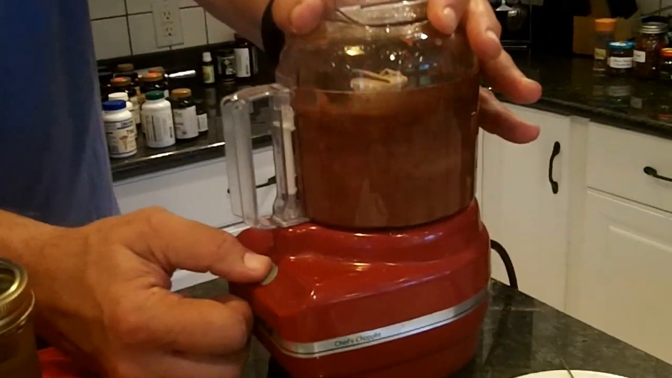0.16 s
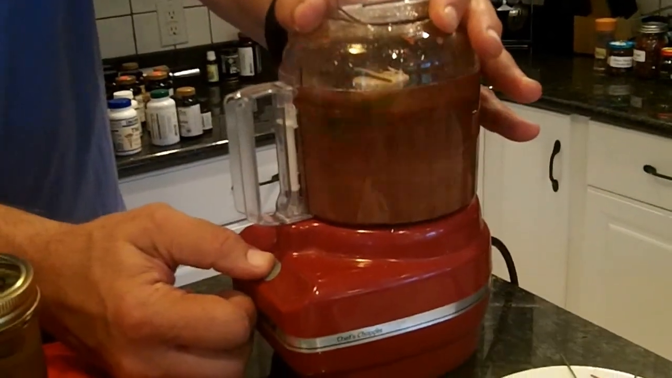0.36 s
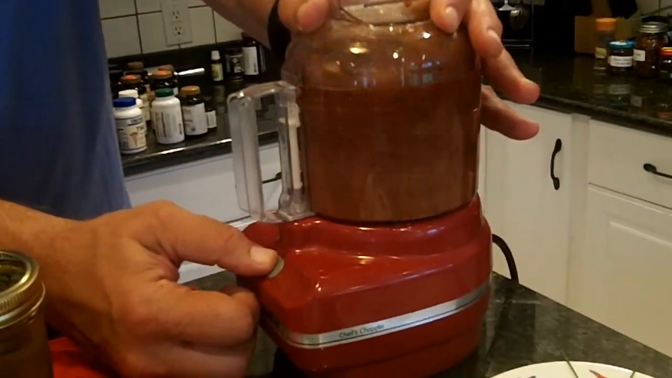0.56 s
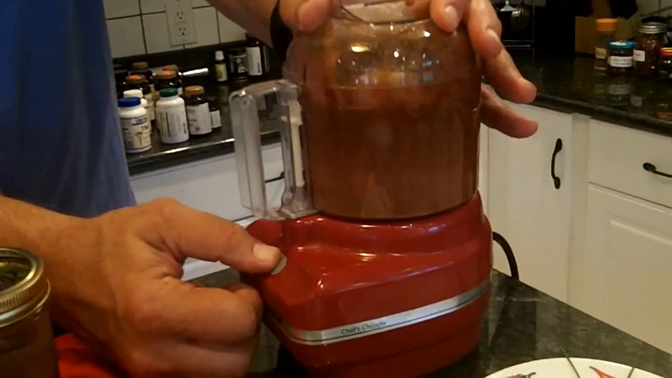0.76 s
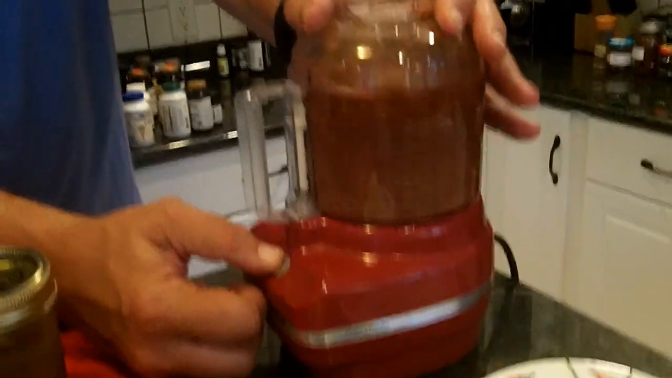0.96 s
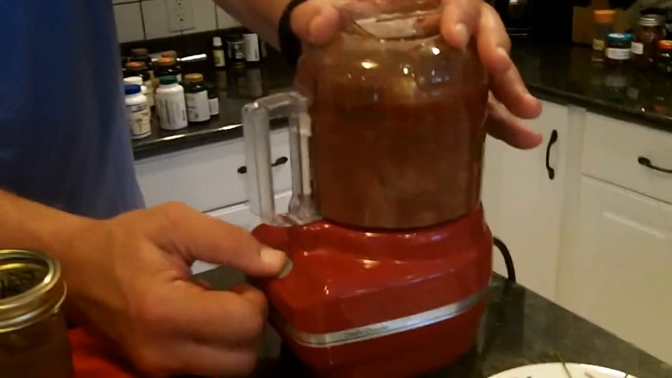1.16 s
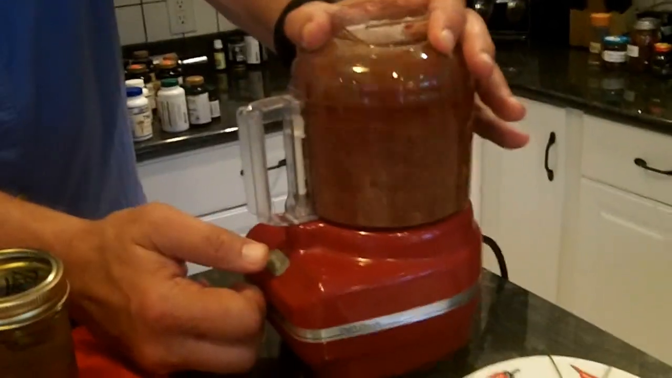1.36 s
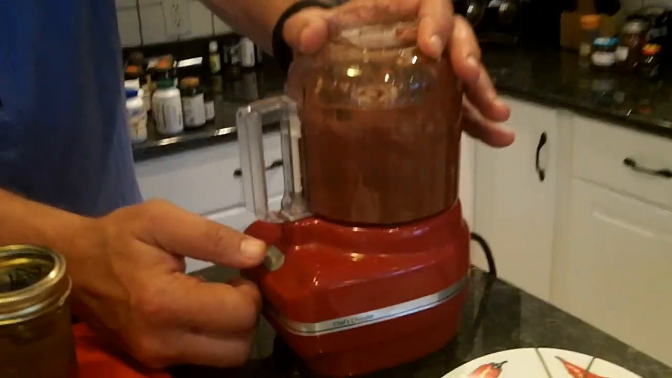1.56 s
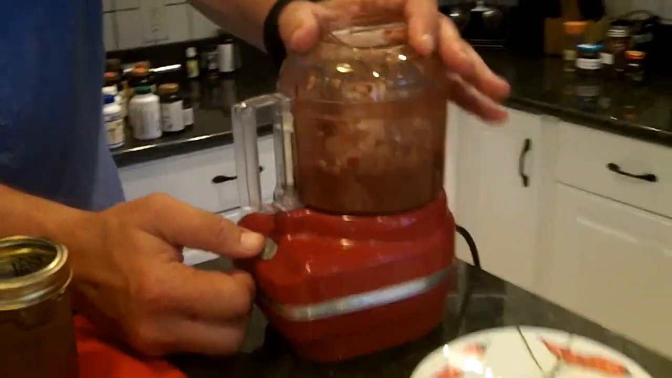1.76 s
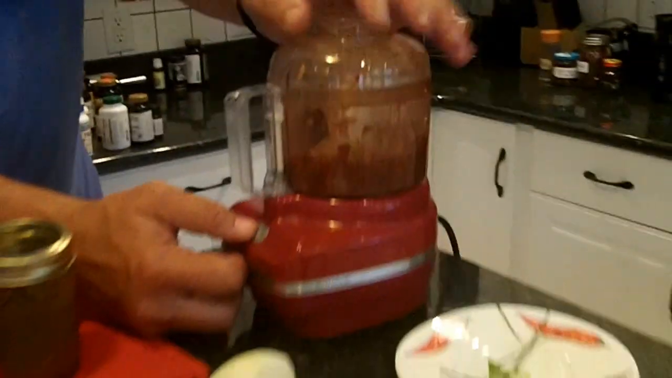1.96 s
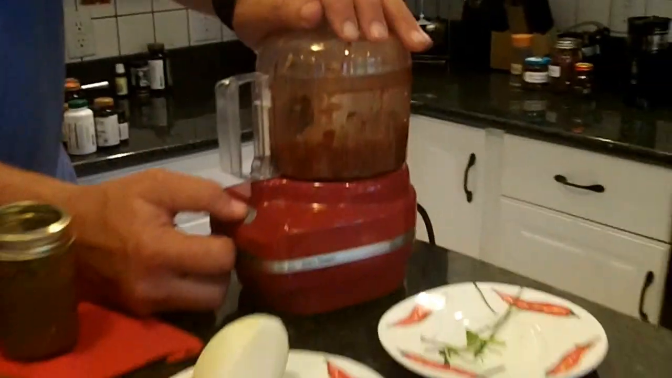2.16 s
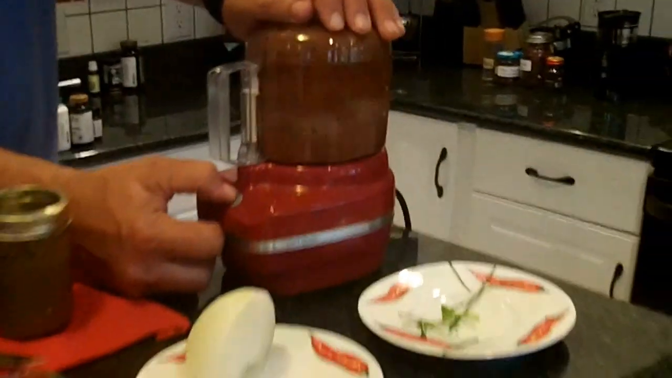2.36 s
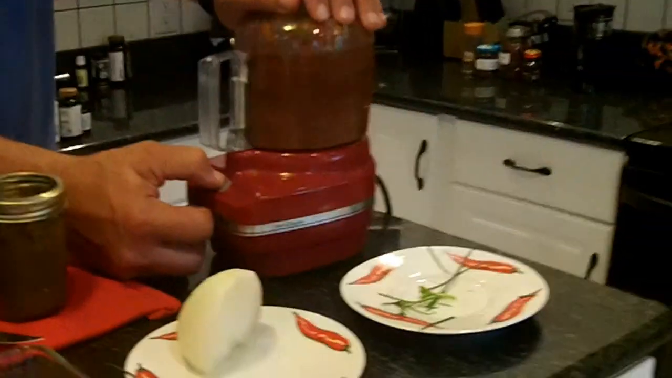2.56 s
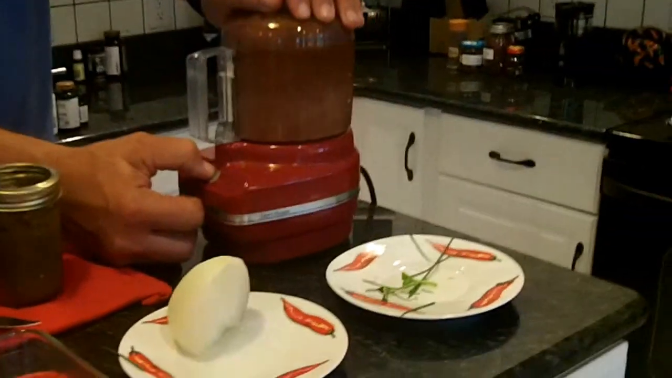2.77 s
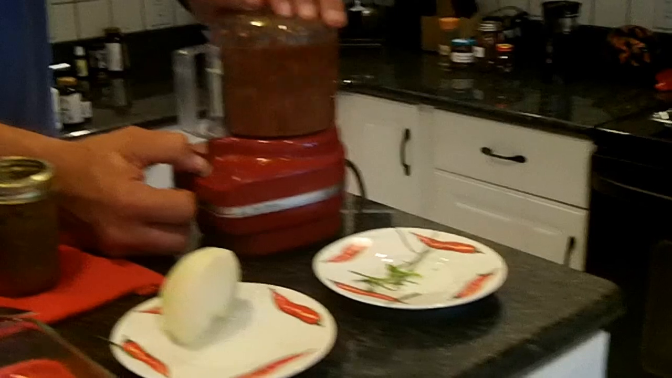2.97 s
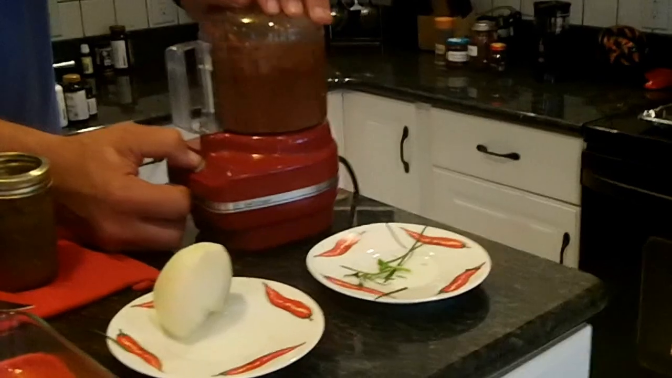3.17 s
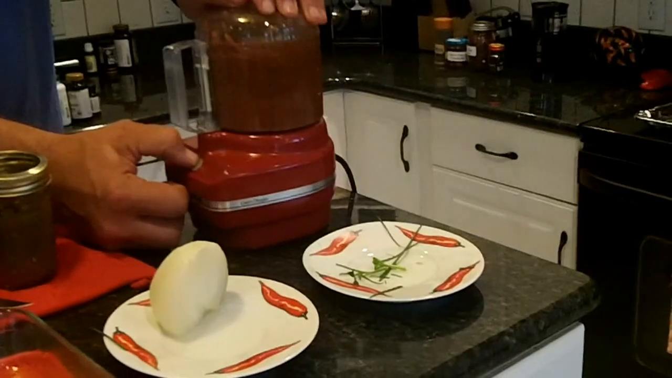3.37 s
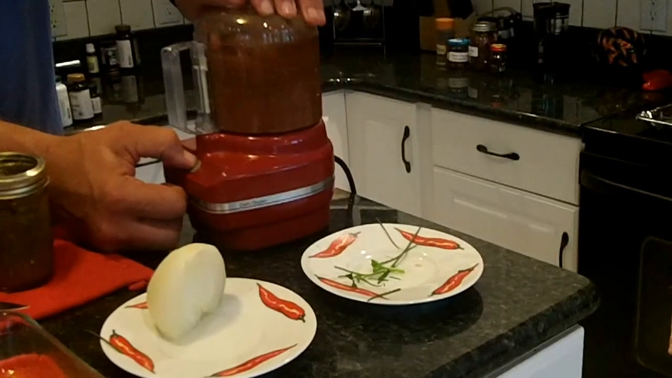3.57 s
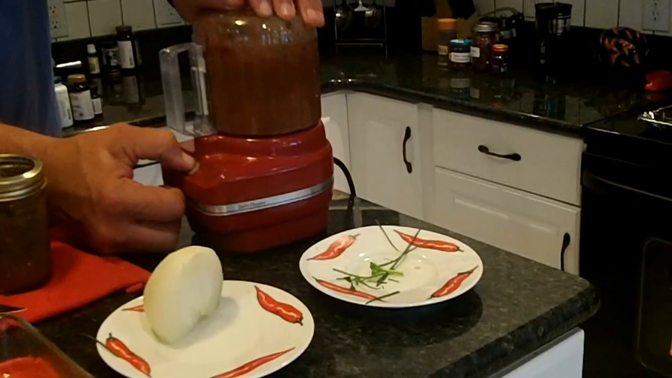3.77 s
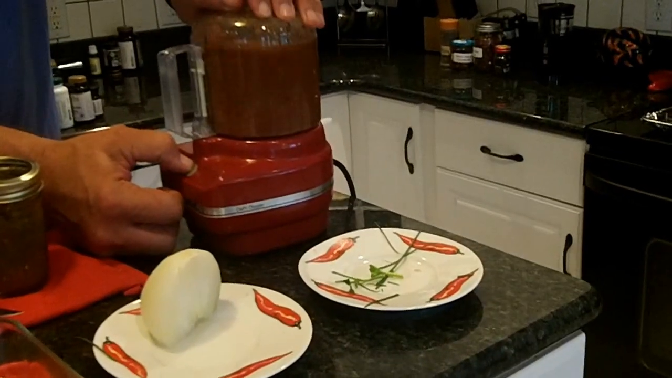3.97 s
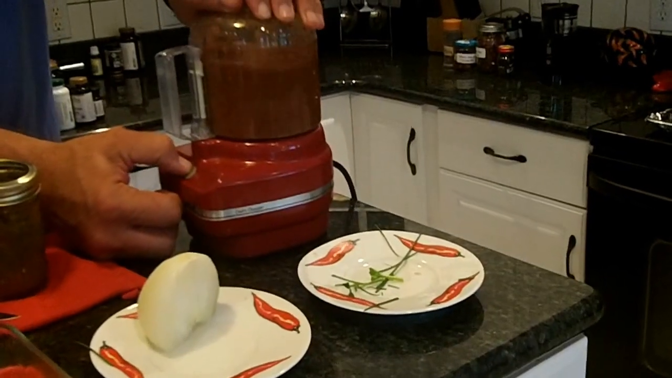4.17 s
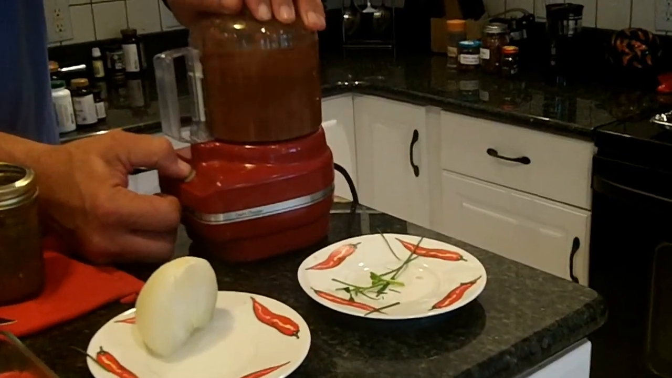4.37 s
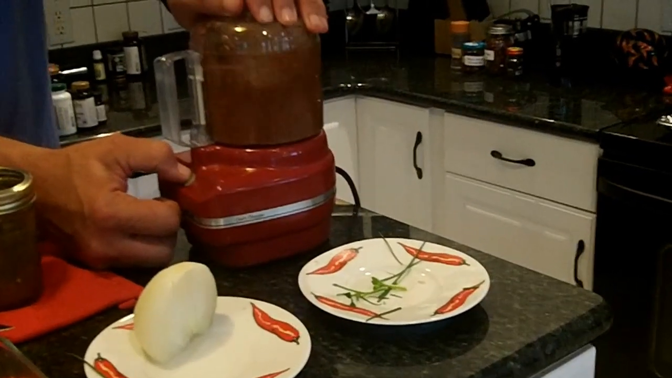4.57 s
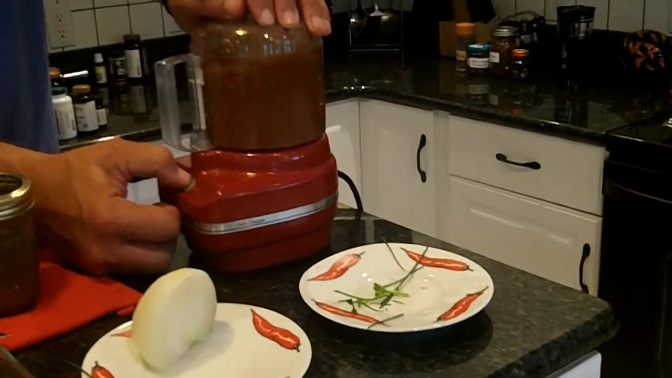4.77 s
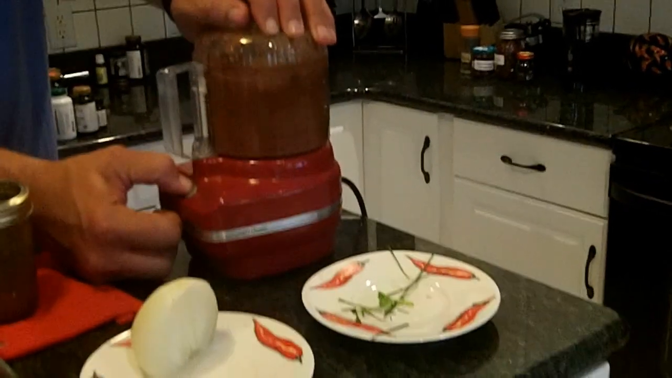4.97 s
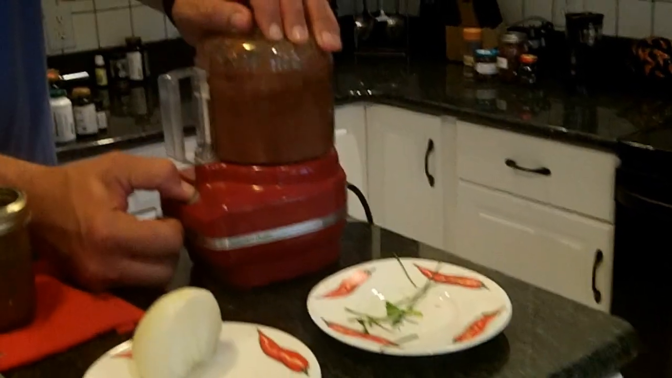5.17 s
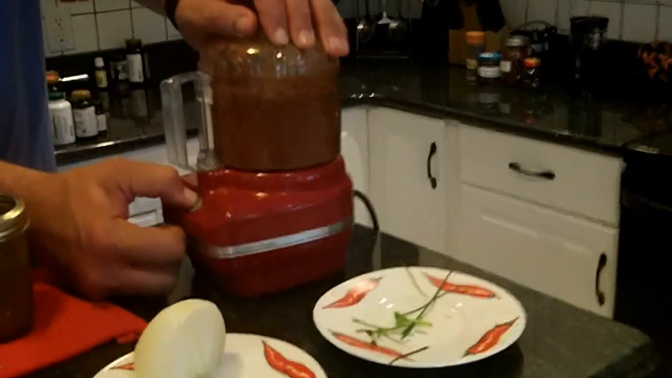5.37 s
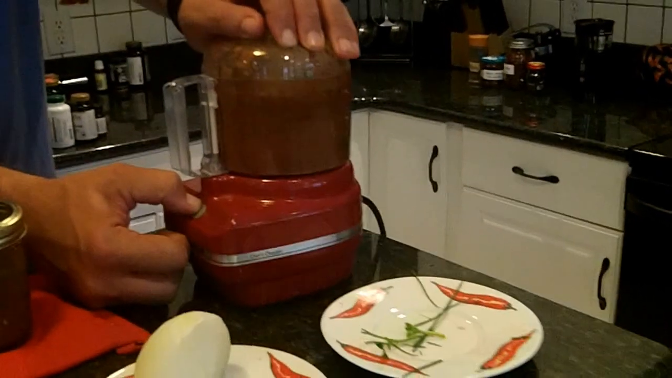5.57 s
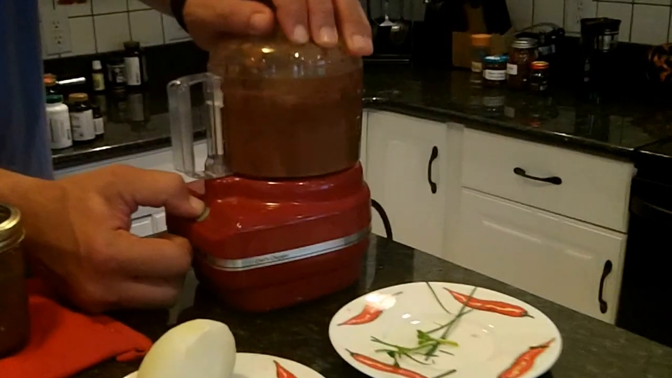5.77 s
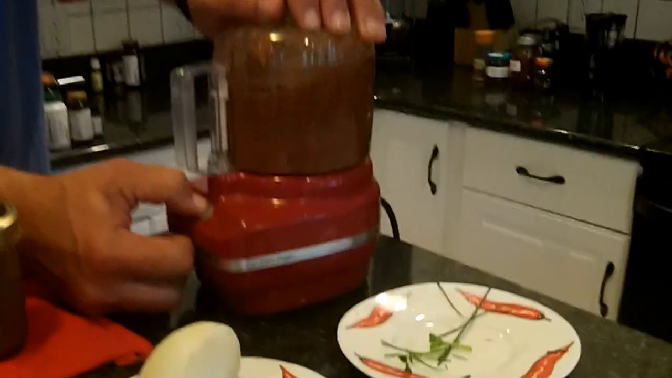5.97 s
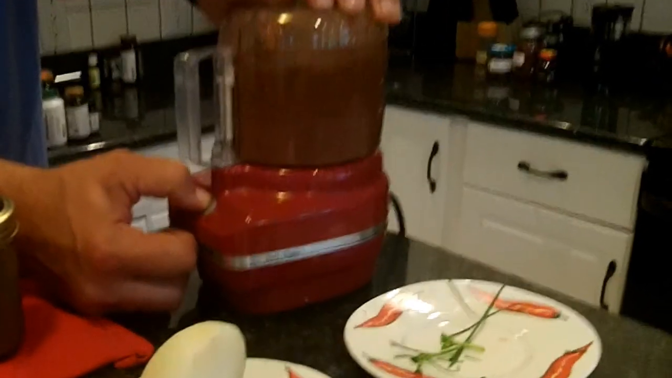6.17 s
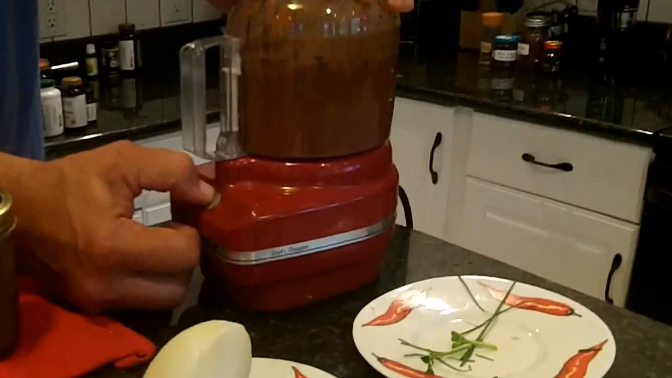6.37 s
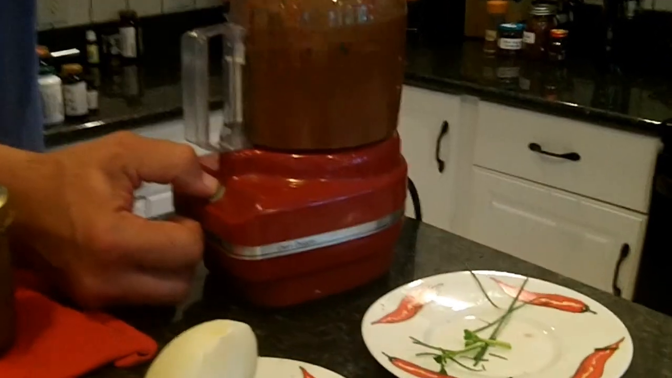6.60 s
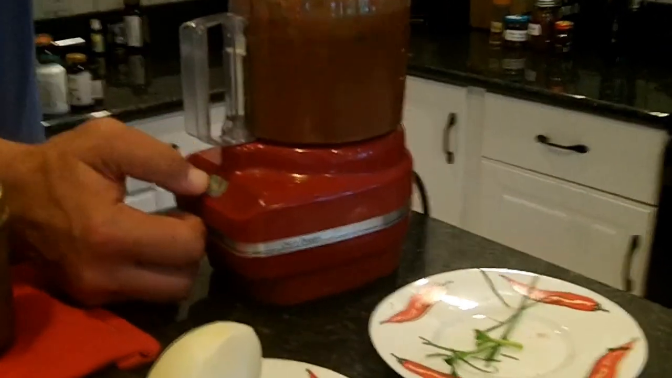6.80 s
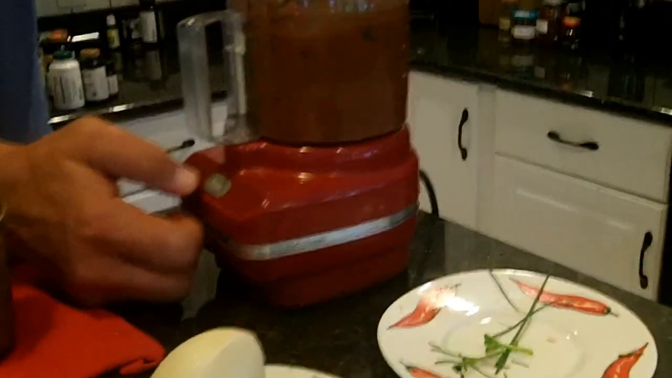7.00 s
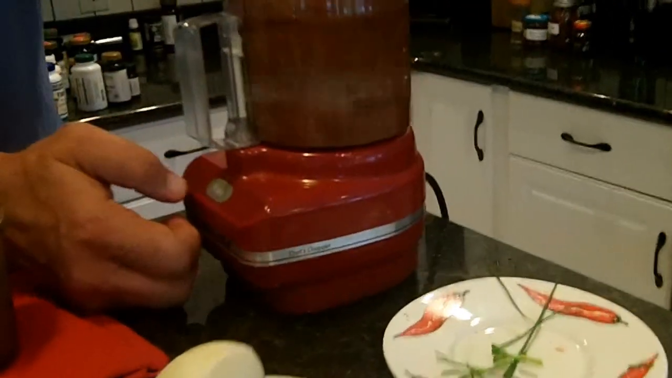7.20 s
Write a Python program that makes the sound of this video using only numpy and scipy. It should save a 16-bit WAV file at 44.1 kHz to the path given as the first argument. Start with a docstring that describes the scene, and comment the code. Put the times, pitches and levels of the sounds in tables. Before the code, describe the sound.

A small food processor whines at high speed through wet vegetable pulp, winds down to a brief dripping pause, then spins up for a longer second run.

```python
"""A small kitchen food processor chops wet vegetables in two pulses, with a short pause between them.
A fast motor drives the blade through a gear: the 12 pinion teeth whine as sine tones tied to one speed curve.
Coloured noise makes the casing rattle, the wet splash, a treble fizz, the drone of the base and worktop rumble.
Pulp slaps the bowl once a blade turn, chunks jolt the drive, and drops tick down in the pause.
A tiled kitchen answers with an echo; a gain control ducks the sound after loud moments."""
import sys
import numpy as np
from scipy import signal
from scipy.fft import rfft, irfft, next_fast_len
from scipy.io import wavfile
from scipy.ndimage import uniform_filter1d, map_coordinates

SR = 44100
rng = np.random.default_rng(int(sys.argv[2]) if len(sys.argv) > 2 else 0)


def store_pcm(level_fs):
    """Save levels as 16-bit WAV."""
    pcm = np.round(np.clip(level_fs, -1, 1) * 32767).astype(np.int16)
    wavfile.write(sys.argv[1], SR, np.atleast_2d(pcm).T)


N = 319284

TEETH = 12  # teeth on the motor's pinion
TEETH_PER_BLADE_TURN = 75.8
# when the whine takes its driven levels: from_s, to_s
DRIVEN_SPANS = [(-0.1, 1.5), (2.32, 6.92)]
# how hard the pulp churns, before random swings: time_s, rattle_db, splash_db
CHURN = [(0.06, -28, -33.5), (0.138, -33, -38), (0.21, -30.5, -33), (0.646, -33, -38.5), (0.69, -25.5, -31),
         (0.754, -40, -40), (0.83, -35, -40.5), (1.35, -33.5, -34.5), (1.412, -32.5, -37), (1.43, -60, -65),
         (1.45, -43.5, -31), (1.484, -26.5, -33.5), (1.648, -31, -32.5), (1.772, -26.5, -51),
         (1.86, -51, -51), (2.068, -80, -71), (2.312, -68.5, -66), (2.322, -30, -43), (2.362, -26, -24),
         (2.398, -60, -38), (2.426, -31, -29.5), (2.59, -37.5, -35.5), (2.61, -30.5, -35), (2.68, -38, -39),
         (2.74, -34, -33), (2.9, -39, -39.5), (2.97, -27.5, -28), (3.05, -36, -37.5), (3.24, -30.5, -30.5),
         (3.6, -35, -35.5), (3.99, -35, -33.5), (4.05, -40, -40), (4.11, -35, -34), (5.02, -32.5, -34),
         (5.11, -35, -34), (5.25, -31.5, -30), (5.38, -40, -41), (5.41, -32, -31), (6.12, -32.5, -30.5),
         (6.75, -33, -32), (6.96, -31, -28.5), (7.03, -38, -39), (7.09, -33, -33), (7.14, -28, -27),
         (7.24, -32.5, -33)]


def amp(db):
    """Turn decibels into a gain."""
    return 10 ** (np.asarray(db) / 20)


def unit(x):
    """Scale a signal to an average strength (rms) of 1."""
    return x / np.sqrt(np.mean(x ** 2) + 1e-20)


def along(points, hz):
    """Read a curve of (Hz, value) points on a log frequency axis."""
    point_hz, value = np.transpose(points)
    return np.interp(np.log(hz + 1), np.log(point_hz + 1), value)


def curves(rows):
    """Give one value per sample for each column after the time."""
    s, *columns = np.transpose(rows)
    return [np.interp(np.arange(N) / SR, s, column) for column in columns]


def wobble(rate):
    """A smooth random curve through `rate` random points a second."""
    steps = np.arange(0, N + 16, 16)  # worked out every 16 samples, straight lines between
    points = rng.standard_normal(int(N * rate / SR) + 4)
    return np.interp(np.arange(N), steps, map_coordinates(points, [steps * rate / SR]))


def filtered(x, response):
    """Filter x by a response that depends on frequency."""
    size = next_fast_len(N + SR // 2)
    return irfft(rfft(x, size) * response(np.fft.rfftfreq(size, 1 / SR)), size)[..., :N]


def rush(spectrum, gate=1):
    """Noise shaped in time by a gate, then coloured by a spectrum, with rms 1."""
    return unit(filtered(gate * rng.standard_normal(N), lambda hz: amp(along(spectrum, hz))))


def ringing(drive, modes):
    """Noise heard only through narrow resonances, then scaled by a drive envelope."""
    def response(hz):
        total = 0
        for centre, width, db in modes:
            resonance = 1j * hz * width / (centre * centre - hz * hz + 1j * hz * width)
            total = total + amp(db) * resonance / np.sqrt(width)
        return total
    return drive * unit(filtered(rng.standard_normal(N), response))


def quiet_kitchen():
    """Steady coloured noise of the kitchen itself."""
    # colour of the background: pitch_hz, relative_level_db
    floor_colour = [(65, -53), (110, -3), (172, -9.5), (195, 1), (312, -5.5), (338, -30), (382, -3),
                    (450, -22), (530, -1), (587, -12), (4090, -26.5), (7700, -42), (14500, -49)]
    return amp(-51.5) * rush(floor_colour)


def kitchen_echo(x):
    """Noise-like echo in which each frequency dies away at its own speed."""
    # how long the echo takes to fall 60 dB: pitch_hz, decay_s
    echo_decay = [(200, 0.76), (2000, 0.73), (8000, 0.43)]
    hz, t, grid = signal.stft(rng.standard_normal(SR // 2), SR, nperseg=256)
    fade = amp(-60 * t / along(echo_decay, hz)[:, None])
    tail = signal.istft(grid * fade, SR, nperseg=256)[1]
    delayed = np.pad(x, (200, 0))  # samples
    return signal.fftconvolve(delayed, tail / np.linalg.norm(tail))[:N]


def worktop_rumble(driving):
    """Deep noise from the worktop that is louder outside the driven spans and swells slowly."""
    # colour of the rumble: pitch_hz, relative_level_db
    rumble_colour = [(18, -31), (30, 5.5), (54, -7), (110, -5.5), (140, -26), (240, -120)]
    rumble_db = -62.5 + 8.5 * (1 - driving) + 1.5 * wobble(4)
    return amp(rumble_db) * rush(rumble_colour)


def base_drone(blade):
    """Broad low noise, booming resonances of the base and a hum at four shakes a blade turn."""
    # colour of the broad drone: pitch_hz, relative_level_db
    drone_colour = [(65, -62), (110, -14.5), (205, -6.5), (259, -1), (286, -36.5), (329, -5.5), (383, -23),
                    (424, -9), (500, -7.5), (650, -32), (1100, -120)]
    # overall drone, before the slow swell and a 3 dB cut: time_s, level_db
    drone_level = [(0.0, -44), (0.9, -46.5), (1.35, -47), (1.6, -52.5), (2.3, -53), (2.4, -50.5),
                   (3.4, -44.5), (3.6, -48), (4.5, -50), (4.8, -46), (5.3, -50), (6.1, -47), (6.95, -45.5),
                   (7.1, -58)]
    # booms of the base on the worktop: pitch_hz, width_hz, relative_level_db
    base_modes = [(159.5, 16, -1.5), (204, 15, 1), (254.5, 15, -5)]
    drone_db = curves(drone_level)[0] + 2.5 * wobble(9)
    hum = 0.53 * amp(4.5 * wobble(4.18)) * np.sin(4 * blade + 0.4 * wobble(3.3))
    boom = ringing(amp(0.5), base_modes)
    return amp(drone_db - 3) * (rush(drone_colour) + hum + boom)


def drips():
    """Pulp drops in the pause: short fading sine tones mixed with noise, like small wet ticks."""
    # the drops: start_s, level_db (of the tone at its start), pitch_hz
    drops = [(1.9146, -54, 1970), (1.9651, -48, 2454), (2.1119, -57, 1577), (2.2741, -44, 1227)]
    out, t = np.zeros(N), np.arange(SR // 20) / SR
    for s, db, hz in drops:
        tick = np.sin(2 * np.pi * hz * t) + 0.45 * rng.standard_normal(len(t))
        out[round(s * SR):][:len(t)] += amp(db - 60 * t / 0.013) * tick  # falls 60 dB in 13 ms
    return out


def driven():
    """1 while the whine takes its driven levels, 0 while it takes its coasting ones, smoothed over 10 ms."""
    t = np.arange(N) / SR
    inside = sum((t > from_s) * (t < to_s) * 1.0 for from_s, to_s in DRIVEN_SPANS)
    return uniform_filter1d(inside, SR // 100)


def jolts(driving):
    """Chunks and small bits jolt the drive: quick rise and fall, as a sharp part and a weaker thud."""
    # blade meets a big chunk: start_s (peak 2 ms later), strength_db
    chunks = [(0.1063, -13), (0.131, -20), (0.243, -12), (0.4211, -4.5), (0.5322, -11), (0.606, -7),
              (0.686, -4), (0.7085, -5), (0.8157, -9), (0.8335, -6), (0.8765, -2.5), (0.9021, -12),
              (0.962, -9), (1.0158, -7.5), (1.2118, -10), (1.358, -6.5), (1.4949, -8.5), (1.534, -23),
              (2.3282, -20), (2.622, -7), (2.7285, -9), (3.1565, -10), (3.241, -23), (3.4338, -6.5),
              (3.5907, -16), (3.674, -9), (3.693, -10), (3.7859, -7), (3.9468, -9), (4.029, -9),
              (4.1461, -11), (4.2198, -7), (5.056, -2), (5.0793, -8), (5.1936, -5.5), (5.3657, -16),
              (5.715, -16), (6.1234, -5.5), (6.201, -7), (7.1546, -7.5)]
    rise_s, fall_s = 0.0012, 0.001
    t = np.arange(N) / SR
    bits = []
    for place, size in rng.random((30, 2)):
        s = place * N / SR
        if driving[int(s * SR)] > 0.5:  # small bits are struck only in the driven spans
            bits.append((s, -15 + 2 * size))
    sharp = np.zeros(N)
    for s, db in chunks + bits:
        near = slice(max(round((s - 0.01) * SR), 0), round((s + 0.04) * SR))
        from_peak = t[near] - s - 0.002
        sharp[near] += amp(db) * np.exp(np.minimum(from_peak / rise_s, -from_peak / fall_s))
    thud = sharp * amp(-26 + 2 * (1 - driving))  # stronger outside the driven spans
    return sharp, thud


def treble_fizz(beat, sharp):
    """High noise that swings with the blade, jumps on chunks and flickers."""
    # colour of the fizz: pitch_hz, relative_level_db
    fizz_colour = [(4940, -54), (8400, -59), (8670, 5), (9100, 14.5), (9950, -1), (10300, -16),
                   (10900, 6.5), (11200, 5), (11700, -18), (12200, -12), (13400, -35), (14400, -34),
                   (15000, -25)]
    # overall fizz, before random swings: time_s, level_db
    fizz_level = [(0.0, -56.5), (1.69, -58), (1.84, -82), (2.31, -81), (2.34, -58.5), (3.0, -61),
                  (5.0, -57.5), (5.5, -54), (7.24, -54)]
    fizz_db, = curves(fizz_level)
    loudness = amp(fizz_db + 1.17 * beat + 0.95 * wobble(70)) + 0.0047 * sharp
    return loudness * rush(fizz_colour, amp(1.496 * wobble(90)))


def wet_splash(beat, sharp):
    """Pulp noise that swings with the blade, plus the ring of bowl and casing under it."""
    # colour of the splash: pitch_hz, relative_level_db
    splash_colour = [(1500, -18.5), (2600, -22.5), (3000, 0.5), (3300, -1), (3800, 4), (4300, -0.5),
                     (4800, 1.5), (5500, -10.5), (7000, -14.5), (7600, -29.5), (7900, -94)]
    # ring of bowl and casing: pitch_hz, width_hz, relative_level_db
    bowl_modes = [(782, 39.2, -8.5), (1598, 75, -6.5), (1920, 26, -23), (2985, 13, 0.5), (4750, 25, -5)]
    splash_db = curves(CHURN)[1]
    loudness = amp(splash_db + beat + 0.29 * wobble(50)) + 0.14 * sharp
    splash = loudness * rush(splash_colour, amp(3.26 * wobble(600)))
    return splash + ringing(amp(splash_db - 9 + beat), bowl_modes)


def casing_rattle(load, slap, sharp, thud):
    """Rough noise of the casing, shaken by the churning pulp and jolted by chunks."""
    # colour of the rattle: pitch_hz, relative_level_db
    rattle_colour = [(180, -61), (300, -14), (428, -33), (626, -7), (689, -8), (790, -5.5), (1110, -9.5),
                     (1220, -2), (1890, -4.5), (2050, -2.5), (2520, -6.5), (3090, -0.5), (5110, -18),
                     (5940, -11), (7800, -54), (10100, -71), (17200, -120)]
    rattle_db = curves(CHURN)[0] + 0.6 * wobble(11) + load + 1.04 * slap + 0.62 * wobble(30)
    loudness = amp(rattle_db) + 0.14 * thud + 0.038 * sharp
    return loudness * rush(rattle_colour, amp(2.2 * wobble(400)))


def shaft_tones(shaft, whine_db, load, slap):
    """Tones at whole multiples of the motor shaft's turning rate, beside the tooth whine."""
    # the tones: turns_multiple (no unit), level_db (relative to the whine)
    orders = [(3, -26.5), (4, -47), (5, -16.5), (7, -19), (8, -25), (9, -40), (11, -10.5), (13, -11.5),
              (15, -13)]
    out = np.zeros(N)
    for k, db in orders:
        level_db = whine_db + db + load + 3.5 * wobble(30) + 0.92 * slap
        out += amp(level_db) * np.sin(k * shaft + 0.85 * wobble(70))
    return out


def casing(hz):
    """Lift or cut in dB that the casing gives a tone near its resonances."""
    # the resonances: pitch_hz, width_hz, lift_db
    casing_modes = [(801.4, 110, 9), (1360, 370, 6), (2080, 130, 9), (3100, 350, 4), (3270, 780, 3),
                    (4730, 370, -4)]
    return sum(db / (1 + (2 * (hz - centre) / width) ** 2) for centre, width, db in casing_modes)


def strain(mesh_hz, driving):
    """Change in dB as the whine swells while a jam brakes the driven gear, then sags about 28 ms later."""
    braking = -np.gradient(mesh_hz) * SR / 9000  # 1 means losing 9000 Hz a second
    jam = driving * np.clip(braking, 0, 1) ** 2
    after = np.roll(uniform_filter1d(jam, SR // 50), round(0.028 * SR))
    return 6 * uniform_filter1d(jam, SR // 200) - 5 * after


def gear_tones(mesh_hz, driving):
    """Levels of whine, overtones and half-rate tone follow the speed and fade as the blade stops."""
    # levels before later offsets: tooth_rate_hz, whine_driven_db, whine_coasting_db, second_driven_db,
    # second_coasting_db, third_driven_db, third_coasting_db, half_rate_db
    tone_levels = [(450, -45, -65, -46, -44.5, -54, -43, -59), (730, -50, -47, -31, -40, -59, -48, -69),
                   (780, -40, -36, -36, -55, -38, -36, -57), (1057.5, -33, -33, -37, -36, -32, -34, -62),
                   (1380, -30, -30, -35, -40, -35, -46, -59), (1639.4, -25, -31, -22.5, -39, -34, -53, -62),
                   (1830, -35, -33.5, -32, -28, -56, -57, -49), (2058, -40, -38, -38, -51, -50, -55, -53),
                   (2280, -29.5, -42, -41, -50, -60, -62, -39), (2520, -30, -39, -40, -56, -71, -70, -45),
                   (2840, -26.5, -25.5, -45, -51, -70, -72, -36),
                   (3070, -25.5, -30, -41.5, -31, -58, -67, -35),
                   (3030, -30.5, -21.5, -46, -49, -67, -66, -31),
                   (3450, -31, -27, -53.5, -51, -75, -70, -47.5), (3620, -26, -38, -51, -54, -66, -70, -46),
                   (3844, -26, -22, -68, -68, -69, -68, -40)]
    stands_s, halt_s = 1.78, 0.15  # the blade comes to rest, and how long that takes
    t = np.arange(N) / SR
    hz, *columns = np.transpose(tone_levels)
    db = [np.interp(mesh_hz, hz, column) for column in columns]
    still_db = -40 * np.clip((t - stands_s) / halt_s, 0, 1) * (t < DRIVEN_SPANS[1][0])
    mixed = [driving * db[k] + (1 - driving) * db[k + 1] for k in (0, 2, 4)]
    return [level + still_db for level in mixed + db[-1:]]


def gear_whine(mesh, mesh_hz, driving, levels, load, slap, sharp):
    """Meeting teeth sing at the tooth rate, its overtones and half of it; uneven bites roughen them."""
    whine_db, second_db, third_db, half_db = levels
    # a slow gear chatters in its backlash (dB)
    slack = 4.0 * (0.44 + 0.77 * driving) * np.clip((3000 - mesh_hz) / 800, 0, 1) * wobble(35)
    # the teeth bite unevenly: once a blade turn, at random and hard on a chunk
    uneven = 1.45 * wobble(60) + 1.33 * wobble(130) + 3.2 * wobble(250) + 0.8 * slap
    bite_db = whine_db + strain(mesh_hz, driving) + load + uneven + slack + casing(mesh_hz)
    bite = amp(bite_db) + 0.63 * sharp
    whine = bite * np.sin(mesh + 0.69 * mesh_hz / 3800 * wobble(110))
    half_db = half_db + 6 * (1 - driving)  # stands out outside the driven spans
    partials = [(2, second_db + 4), (3, third_db + 5), (4, third_db - 25.5), (1 / 2, half_db - 6.5)]
    for k, db in partials:
        level_db = db + casing(k * mesh_hz) + load + 4.1 * wobble(70)
        jitter = 2.16 * np.clip(k * mesh_hz / 6000, 0.3, 1) * wobble(200)  # radians
        whine += amp(level_db) * np.sin(k * mesh + jitter)
    return whine


def processor():
    """The whole machine, its tones tied to one speed; returns its sharper sounds and its low drone."""
    # motor speed in each pulse, sagging under load, before fine jitter: time_s, tooth_rate_hz
    speed = [
        [(0.0, 2364), (0.06, 2808), (0.144, 3222), (0.32, 3496), (0.53, 3610), (0.56, 3170), (0.71, 3605),
         (0.74, 3188), (0.81, 3530), (0.961, 3455), (1.15, 3780), (1.22, 3497), (1.32, 3725), (1.37, 3334),
         (1.39, 3003), (1.42, 2603), (1.46, 2283), (1.68, 785.5), (1.78, 402), (1.86, 280)],
        [(2.312, 660), (2.335, 744), (2.35, 1280), (2.37, 1613), (2.43, 2244), (2.55, 3075), (2.62, 3393),
         (2.67, 3142), (2.73, 3368), (2.78, 2950), (2.9, 3102), (2.981, 3470), (3.09, 3298), (3.2, 3600),
         (3.271, 3695), (3.341, 3604), (3.5, 3817), (3.547, 3698), (3.698, 3782), (3.738, 3673), (3.878, 3816),
         (4.04, 3720), (4.15, 3892), (4.29, 3718), (4.354, 3867), (4.425, 3867), (4.445, 3565), (4.5, 3614),
         (4.6, 3844), (4.75, 3791), (4.972, 3840), (5.146, 3793), (5.22, 3866), (5.34, 3762), (5.436, 3948),
         (5.526, 3820), (5.875, 3880), (5.95, 3964), (6.165, 3880), (6.33, 3947), (6.571, 3846), (6.673, 3968),
         (6.777, 3894), (6.896, 3930), (7.03, 3050), (7.16, 2212), (7.239, 1696)],
    ]
    mesh_hz, = curves(np.vstack(speed))
    driving = driven()
    jitter = 0.003042 * wobble(25) + 0.005 * wobble(70) + 0.00727 * wobble(300)
    mesh = 2 * np.pi * np.cumsum(mesh_hz * (1 + jitter)) / SR  # turning angles in radians
    shaft, blade = mesh / TEETH, mesh / TEETH_PER_BLADE_TURN
    sharp, thud = jolts(driving)
    slap = np.cos(blade)  # pulp load swings once a blade turn
    # lumps felt by many parts at once (dB)
    load = 1.4 * wobble(8) + 0.51 * wobble(25) + 0.96 * wobble(70) + 1.0 * wobble(140)
    beat = load + 1.3 * slap + 0.57 * np.cos(shaft)
    levels = gear_tones(mesh_hz, driving)
    machine = gear_whine(mesh, mesh_hz, driving, levels, load, slap, sharp)
    machine += shaft_tones(shaft, levels[0], load, slap)
    machine += casing_rattle(load, slap, sharp, thud)
    machine += wet_splash(beat, sharp) + treble_fizz(beat, sharp)
    return machine, base_drone(blade) + worktop_rumble(driving)


def scene():
    """Machine and drips with their echo, the low drone and the quiet kitchen."""
    machine, drone = processor()
    near = machine + drips()
    return (near + amp(-7.5) * kitchen_echo(near) + drone + quiet_kitchen())[None]


def record(dry):
    """Gain control ducks after loud moments; the sound is thin near 8 kHz, with nothing above 15150 Hz."""
    keep = np.exp(-1 / (0.018 * SR))  # loudness is averaged over about 18 ms
    recent_db = 10 * np.log10(signal.lfilter([1 - keep], [1, -keep], dry ** 2) + 1e-12)
    lagged_db = np.pad(recent_db, ((0, 0), (SR // 300, 0)), mode="edge")[:, :N]
    ducked = dry * amp(-0.4 * np.maximum(lagged_db + 25.5, 0))
    rounded = ducked / (1 + np.abs(ducked / 0.6) ** 4) ** (1 / 4)  # peaks round off softly

    def treble_shape(hz):
        thin_band = 1 - 0.9 * np.exp(-((hz - 8100) / 330) ** 4)
        return thin_band * np.clip((15150 - hz) / 60, 0, 1)
    return filtered(rounded, treble_shape)


dry = scene()
out = record(dry)
store_pcm(out)
```